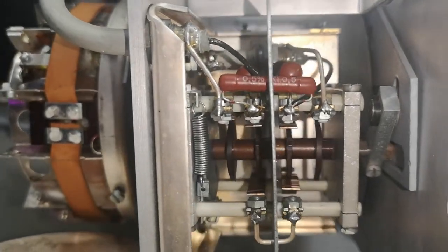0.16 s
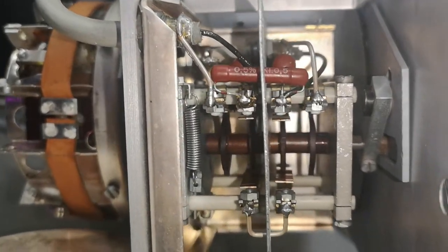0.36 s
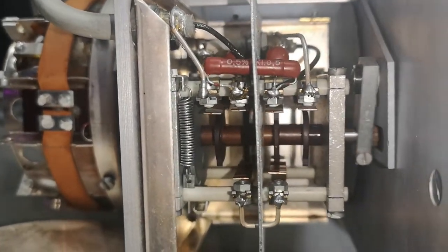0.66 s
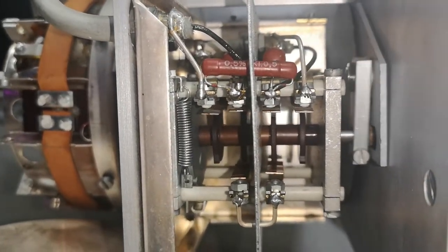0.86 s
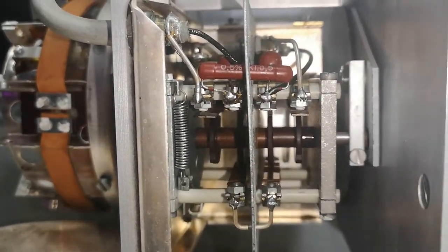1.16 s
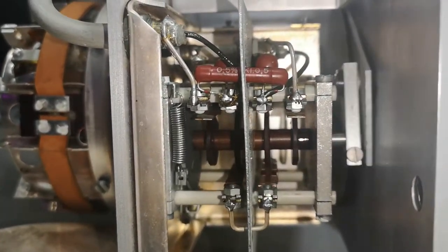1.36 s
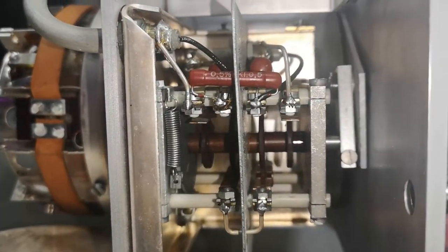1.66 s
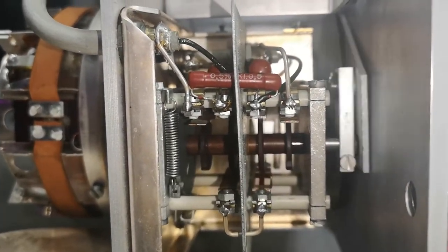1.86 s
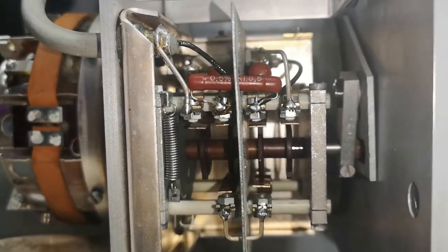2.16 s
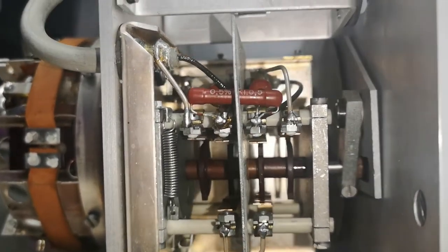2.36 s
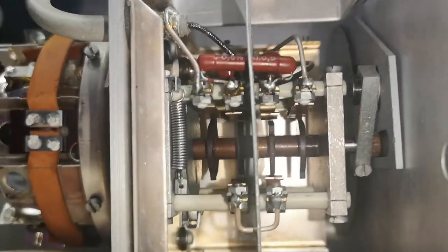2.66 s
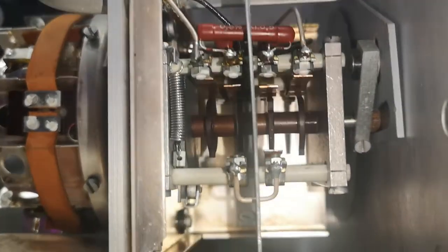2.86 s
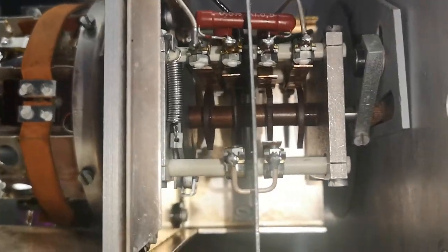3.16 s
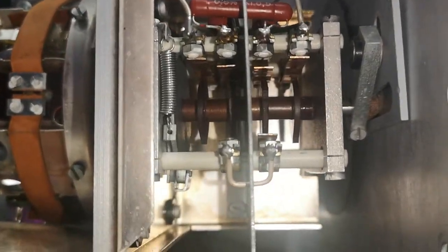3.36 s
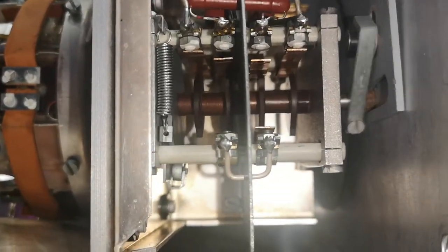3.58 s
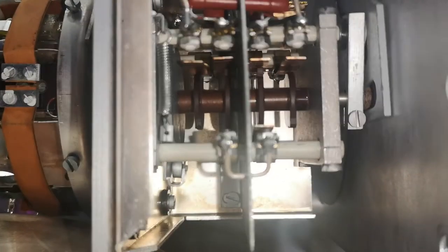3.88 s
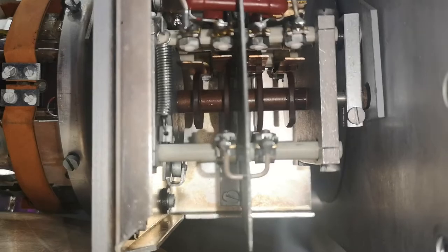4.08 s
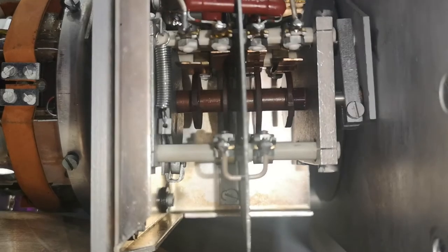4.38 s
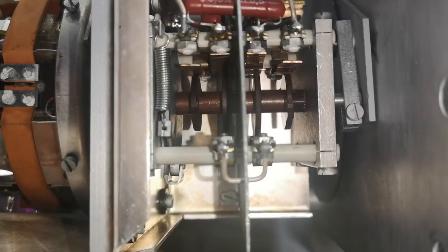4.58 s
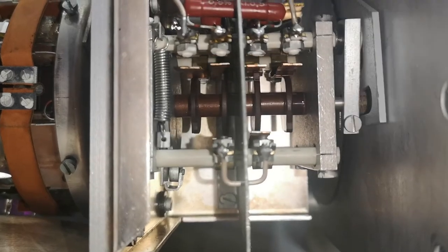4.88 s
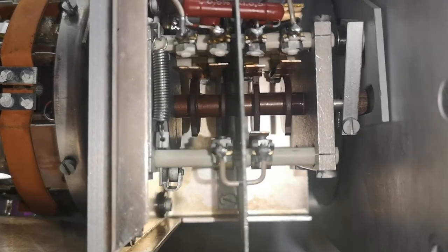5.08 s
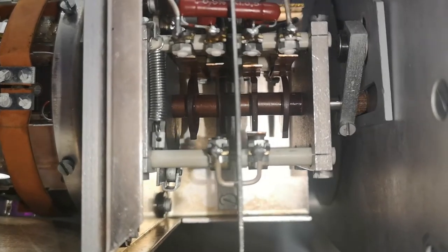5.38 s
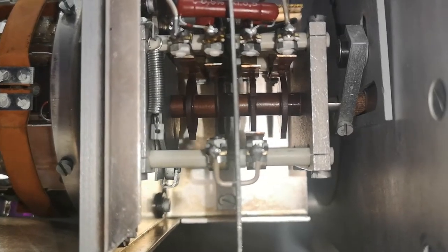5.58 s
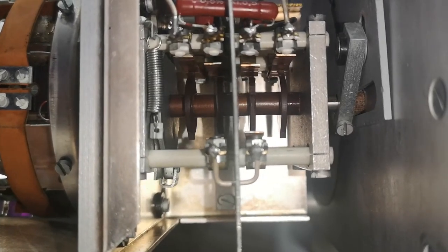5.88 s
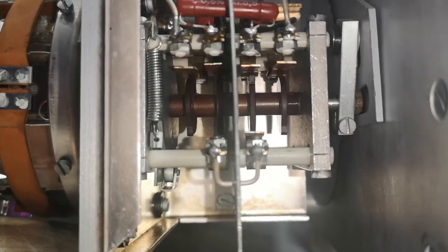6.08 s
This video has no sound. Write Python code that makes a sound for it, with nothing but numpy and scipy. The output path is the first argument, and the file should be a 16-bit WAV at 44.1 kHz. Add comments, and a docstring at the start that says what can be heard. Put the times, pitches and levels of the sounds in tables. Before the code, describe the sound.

Close up, a sprung metal switch snaps with sharp ringing clacks every second or so, each followed by lighter scraping contact clicks.

```python
"""A rotary step switch in a sheet-metal cabinet is turned step by step, close to a pair of microphone ports.
Its sprung detent gives impacts (short noise bursts) that excite long-ringing modes: a crack, a thud and a ring.
About half a second after a snap the wipers click, scrape and seat on a contact: impact and stick-slip friction.
Small clicks, spring ticks and bumps fall between; hum, air and the rumble of handling lie underneath as
steady tones and coloured noise."""
import sys
import numpy as np
from scipy import signal
from scipy.fft import rfft, irfft, next_fast_len
from scipy.io import wavfile

SR = 44100
rng = np.random.default_rng(int(sys.argv[2]) if len(sys.argv) > 2 else 0)


def pcm_store(signal):
    """Save signal as 16-bit PCM."""
    levels = np.round(np.clip(np.atleast_2d(signal), -1, 1) * 32767)
    wavfile.write(sys.argv[1], SR, levels.astype(np.int16).T)


N = 274743  # length in samples

# The detent drops home. Each row: crack time in seconds, crack level in dB, brightness in dB per octave,
# length of the drop in seconds, first touch in dB, arm in dB, arm t60 in seconds, whine in dB, cabinet thud in dB.
DETENTS = [(-.06, -18, -17, 0.003, -30, -40.5, 1.07, -53.5, -39.5),
           (1.597, -13, -3, 0.012, -25, -42, 1.29, -46, -26.5),
           (3.303, -11.5, 3.5, 0.0044, -24, -38, 1.28, -48, -38.5),
           (4.6046, -13, -3, .0105, -16.5, -37, 1.13, -49, -29),
           (5.665, -12, 3.5, 0.0035, -34, -34, 0.72, -51, -44.5)]
# The wipers cross a contact. Each row: edge click time in seconds, edge click in dB, delay until they seat
# in seconds, seating click in dB, scrape in dB, cabinet thud of the seating in dB.
STROKES = [(0.348, -31, 0.01, -35.5, -51, -46), (.639, -38, .009, -34.5, -43.5, -47),
           (2.134, -32.5, .023, -37.5, -36.5, -43.5), (3.836, -32, .024, -32.5, -33, -46),
           (5.086, -30.5, 0.034, -36.5, -31, -40), (6.2013, -31, .008, -30, -38, -53)]
# Lone clicks as the lever's play is taken up. Each row: time in seconds, level in dB,
# brightness in dB per octave, cabinet thud in dB.
CLICKS = [(.2095, -32.5, 3.5, -55), (.241, -54, 7, -83), (.411, -49, -4, -61), (1.09, -61.5, -18, -62),
          (3.664, -39, -12, -45.5), (4.192, -48, -13, -57), (6.006, -42.5, -9, -42)]
# The loaded spring ticks. Each row: time in seconds, level in dB, brightness in dB per octave.
TICKS = [(1.409, -73.5, 19), (1.557, -51, 2.5), (2.003, -54, -4.5), (2.895, -57.5, -4), (2.963, -65, 10),
         (3.19, -61.5, -4), (4.462, -59.5, 21), (4.576, -47.5, 1), (5.34, -60.5, -5.5), (5.551, -46.5, 6.5),
         (5.918, -54, -2)]
# Soft bumps on the cabinet. Each row: time in seconds, level in dB, t60 in seconds, lowest panel mode in Hz.
BUMPS = [(2.534, -43, 0.046, 185.7), (3.91, -43.5, 0.17, 112.8)]
# A contact blade is plucked free. Each row: time in seconds, frequency in Hz, level in dB, t60 in seconds.
BLADE_PLUCKS = [(5.13, 1021, -62, 1.0)]
# The hand's unrest. Each row: time in seconds, rumble level in dB.
HANDLING = [(0, -64.5), (1.4, -67), (3.08, -63), (3.22, -50), (3.54, -60), (3.68, -46), (4.0, -48),
            (4.25, -62), (4.43, -51.5), (5.45, -63.5), (6.13, -64.5), (6.22, -44)]

# Modes of the detent's steel frame. Each row: frequency in Hz, relative level in dB, t60 in seconds.
FRAME_MODES = [(2428, -3, 0.55), (2541, -1, 0.33), (2702, -1, 0.3), (2895, -2, 0.34), (3348, -6, 0.42),
               (3817, -14, 0.34), (4371, -14, 0.38), (4635, -8, 0.33), (5270, -15, 0.7), (5873, -21, 0.55),
               (6433, -14, 0.34), (6541, -11, 0.36), (7908, -9, 0.4), (8059, -10, 0.45), (8349, -13, 0.38),
               (8538, -17, 0.34), (9340, -20, 0.45)]
# Modes of the lever and wiper blades. Each row: frequency in Hz, relative level in dB, t60 in seconds.
LEVER_MODES = [(1970, -2, 0.16), (2422, 0.5, 0.19), (2443, 12, 0.041), (2650, -3.5, 0.22), (5260, 6, 0.043)]
# Modes of the cabinet panel. Each row: frequency as a ratio to the lowest mode, relative level in dB.
PANEL_MODES = [(1, 5), (1.33, -8), (1.76, -8.5), (2.23, -10.5)]
# Resonances of the switch's metal plates. Each row: frequency in Hz, level in dB (only differences count).
PLATES = [(3483, -52), (3688, -55), (4463, -53), (4657, -53), (4856, -51), (5044, -51), (5599, -52),
          (6142, -53), (6546, -53), (7230, -53), (7526, -53), (7989, -55), (8586, -54), (9049, -57)]
# Steady hum tones. Each row: frequency in Hz, level in dB rms.
HUM = [(102.3, -64), (118.4, -66.5)]

# Noise spectra of the detent crack, wiper contact, coil spring, spring tick, cabinet thud, handling rumble,
# shaft bearing and room air. Each row: frequency in Hz, relative density in dB per Hz.
CRACK = [(100, -30), (250, -15.5), (440, -5), (620, -35.5), (1000, -20), (1400, -19), (1950, -5),
         (2300, -0.5), (2700, 1.5), (3150, -13), (4200, -11), (5200, -10), (6300, -11), (7800, -8.5),
         (10000, -20.5), (13000, -29.5), (15500, -35)]
WIPER = [(120, -29), (250, -29), (420, -9), (750, -29), (1300, -17), (1650, -14), (2000, -6.5), (2720, 1),
         (2950, -11.5), (4400, -15), (5200, -12.5), (6000, -16), (7500, -10.5), (10500, -25), (15500, -40)]
SPRING = [(250, -9.5), (420, 2.5), (580, -16.5), (900, -11.5), (1300, -9.5), (2500, 1), (3800, -14),
          (5200, -11.5), (6500, -16), (8200, -13.5), (10200, -31.5), (15000, -41.5)]
TICK = [(800, -30.5), (2500, 1.5), (3800, -11.5), (5300, 1.5), (6500, -5.5), (8300, -3), (10500, -17.5),
        (15000, -24.5)]
THUD = [(25, -19), (70, -12), (115, 10), (155, -7), (200, -8), (255, -12.5), (350, -8), (600, -23.5),
        (1500, -76.5)]
RUMBLE = [(11, -25), (18, -3), (43, 4), (76, -13), (100, -2.5), (130, -30.5), (220, -120)]
BEARING = [(150, -12.5), (280, -0.5), (450, -18), (1200, -27), (1750, -15), (2120, 4), (2450, -11),
           (3200, -26.5), (8000, -22.5), (14000, -38.5)]
AIR = [(35, -33.5), (60, -12), (113, -7), (133, -13), (172, -17), (281, -15.5), (437, -22.5), (862, -30.5),
       (1950, -24), (5330, -35), (6280, -38), (7750, -33.5), (9790, -44), (14900, -42), (16000, -51)]

# Damping of the crack and of the wiper clicks. Each row: frequency in Hz, t60 in seconds.
CRACK_T60 = [(300, 0.035), (2300, 0.073), (5000, 0.06), (12000, 0.058)]
WIPER_T60 = [(300, 0.14), (2500, 0.14), (5000, 0.12), (12000, 0.039)]
# How the cabinet's near field meets the two ports. Each row: frequency in Hz, likeness from 0 to 1,
# lead of the left port in radians, left over right in dB.
PORTS = [(40, .995, 0, 0), (130, .96, 0, 0), (480, .88, 1.6, 5), (700, .75, 1.7, 6), (1350, .45, 1.5, -4),
         (2000, .75, 2.4, 2), (2400, .65, 3.1, 4), (3100, .35, 3, 0), (4200, .2, 2.2, -1),
         (6000, .1, 1.6, 1), (12000, .1, 0, 0)]

TOUCH_BRIGHT = -0.5  # the roller's touch and skip, dB per octave
SKIP_DB, SPRING_DB, FRAME_DB = -4.5, -20.5, -30.5  # against the crack
FRAME_BRIGHT = -0.5  # added to the crack's brightness, dB per octave
THUD_T60 = .39  # seconds, under a detent
WHINE_HOLD_S, WHINE_STEP_DB = 0.18, 11.5  # the whine holds, then drops by this step
WHINE_LIFE = 0.99  # the whine's t60 as a share of the arm's
EDGE_BRIGHT, SEAT_BRIGHT = 2.1, -8.5  # dB per octave
SCRAPE_LAG_S = 0.025  # from the edge click to the loudest scraping
SCRAPE_RISE_S, SCRAPE_FALL_S = 0.039, 0.043  # time per 20 dB
SLIPS_PER_S, SLIP_SCATTER_DB, SLIP_T60 = 115, 2, .06  # the jerks within a scrape; t60 in seconds
WHISPER_LEAD_S, WHISPER_ATTACK_S = .08, 0.037  # the spring stretches before each stroke
WHISPER_DB, WHISPER_BRIGHT = -50, 0  # brightness in dB per octave
TICK_ATTACK_S, TICK_RING_T60 = 0.00041, .22  # seconds
UNREST_DB, UNREST_PER_S = 3.5, 12  # the rumble's random swells
JOLT_DB, JOLT_S = -58, 0.061  # each snap and stroke jolts the hand: level and half-width
RUB_S, RUB_DB, RUB_WIDTH_S = 2.82, -65.5, .24  # the shaft's rub: middle, level and half-width
TOP_HZ = 15800  # upper band limit
SIDES = np.array([[.5], [-.5]])  # left and right shares of a difference between the ports


def amp(db):
    """Level law: decibels to amplitude gain."""
    return 10 ** (np.asarray(db) / 20)


def unit(x):
    """Normalisation: scale to rms 1."""
    return x / np.sqrt(np.mean(x ** 2) + 1e-20)


def along(points, hz, axis=1):
    """Interpolation of one table column over a logarithmic frequency axis."""
    table = np.transpose(points)
    return np.interp(np.log(hz + 1), np.log(table[0] + 1), table[axis])


def tilt(hz, bright):
    """Contact stiffness: a harder contact lifts the treble, here in dB per octave from 2 to 10 kHz."""
    return bright * np.log2(np.clip(hz, 2000, 10000) / 2000)


def filtered(x, response):
    """Linear filtering: the spectrum is multiplied by a response of frequency."""
    size = x.shape[-1]
    padded = next_fast_len(size + 8192)
    spectrum = rfft(x, padded) * response(np.fft.rfftfreq(padded, 1 / SR))
    return irfft(spectrum, padded)[..., :size]


def noise(spectrum, size, bright=0):
    """Spectral shaping: two unrelated white noises are coloured and brought to rms 1."""
    white = rng.standard_normal((2, size))
    return unit(filtered(white, lambda hz: amp(along(spectrum, hz) + tilt(hz, bright))))


def wobble(t, rate):
    """Slow random fluctuation: straight lines between rate random knots a second."""
    return np.interp(t * rate, np.arange(len(t)), rng.standard_normal(len(t)))


def fade(t, t60):
    """Exponential damping: free decay, 60 dB down after t60."""
    return np.exp(-np.log(1000) * t / np.maximum(t60, 1e-3))


def swell(t, attack):
    """Exponential approach: the build-up of a vibration."""
    return 1 - np.exp(-t / max(attack, 1e-5))


def hump(x, width):
    """Gaussian bell: a smooth rise and fall around x = 0."""
    return np.exp(-(x / width) ** 2)


def add(track, s, sound):
    """Superposition: a sound is mixed into the track at time s."""
    start = round(s * SR)
    lo, hi = max(start, 0), min(start + sound.shape[-1], N)
    if hi > lo:
        track[:, lo:hi] += sound[:, lo - start:hi - start]


def ports(pair):
    """Partial coherence: two unrelated signals become left and right, partly alike and out of step."""
    def response(hz):
        turn = np.arccos(np.clip(along(PORTS, hz), 0, 1)) / 2
        phase = np.exp(.5j * along(PORTS, hz, axis=2))
        left = phase * amp(along(PORTS, hz, axis=3) / 2)
        return np.array([[np.cos(turn) * left, np.sin(turn) * left],
                         [np.cos(turn) / left, -np.sin(turn) / left]])
    return filtered(pair, response).sum(axis=1)


def plated(pair, depth_db=9, width_hz=65, dip_db=4):
    """Resonance: the plates' modes stand out of a contact's treble as spectral peaks."""
    top = max(db for _, db in PLATES)

    def response(hz):
        peaks = sum(np.sqrt(amp(db - top)) * hump(hz - centre, width_hz) for centre, db in PLATES)
        dip = dip_db * swell(np.maximum(hz - 2900, 0), 200)  # lowers the treble between the peaks
        return amp(depth_db * peaks - dip)
    return unit(filtered(pair, response))


def burst(spectrum, t60s, bright):
    """Impact: a blow excites countless damped modes, each band dying at its own speed."""
    blow = plated(noise(spectrum, SR // 4, bright))
    hz, t, bands = signal.stft(blow, SR, nperseg=128)
    damping = fade(t, along(t60s, hz)[:, None])
    return signal.istft(bands * damping, SR, nperseg=128)[1]


def partial(t, hz, t60, lead, pan_db):
    """Normal mode: one damped sine, with a phase and level difference between the two ports."""
    phase = 2 * np.pi * (hz * t + rng.random()) + SIDES * lead
    return amp(SIDES * pan_db) * fade(t, t60) * np.sin(phase)


def shimmer(coil_hz, t60=0.41, wash_t60=0.41, lines_db=-2, scatter_db=4):
    """Modal density: the coil spring's many close modes, at new strengths each time, over a dense wash."""
    t = np.arange(SR) / SR
    shape = (2, len(coil_hz))
    strengths = amp(along(SPRING, coil_hz) + rng.normal(0, scatter_db, shape))
    lines = np.zeros((2, SR // 2 + 1), complex)  # one spectral bin per Hz
    lines[:, coil_hz] = strengths * np.exp(2j * np.pi * rng.random(shape))
    coils = amp(lines_db) * unit(irfft(lines, SR)) * fade(t, t60)
    wash = noise(SPRING, SR) * fade(t, wash_t60)  # the cabinet's answer
    return (coils + wash) * swell(t, 0.0014)


def thud(db, t60, attack=0.019, panel_hz=114, panel_db=-2):
    """Plate vibration: the cabinet booms under a blow, a few panel modes among many weaker ones."""
    t = np.arange(SR) / SR
    panel = sum(amp(panel_db + level) * np.sin(2 * np.pi * (ratio * panel_hz * t + rng.random()))
                for ratio, level in PANEL_MODES)
    body = noise(THUD, SR) + panel * np.array([[1], [0]])
    return amp(db) * body * swell(t, attack) * fade(t, t60)


def frame(bright, twin_db=-5):
    """Beating: the frame's modes come in close pairs that drift in and out of phase."""
    t = np.arange(SR) / SR
    out = np.zeros((2, len(t)))
    for hz, db, t60 in FRAME_MODES:
        scatter_db, pan_db, lead, split = rng.normal(0, [2.5, 2, 1, .004])
        mode = partial(t, hz, t60, lead, pan_db)
        twin = partial(t, hz * (1 + split), t60, -lead, -pan_db)
        out += amp(db + scatter_db + tilt(hz, bright)) * (mode + amp(twin_db) * twin)
    return out * swell(t, 0.0017)


def arm(t60, hz=491, lead=1.8, pan_db=6):
    """Damped free vibration: the detent arm sings on, as long as the grip on the lever lets it."""
    t = np.arange(3 * SR // 2) / SR
    return swell(t, 0.0033) * partial(t, hz, t60, lead, pan_db)


def whine(t60, hz=1957, lead=0.51, waver_hz=6):
    """Frequency modulation: a wavering tone near the arm's fourth harmonic holds, drops a step, dies away."""
    t = np.arange(SR) / SR
    late = np.maximum(t - WHINE_HOLD_S, 0)
    waver_db = 1.3 * wobble(t, rate=20)
    step_db = WHINE_STEP_DB * swell(late, 0.0083)
    level = swell(t, 0.0027) * fade(late, t60) * amp(waver_db - step_db)
    phase = 2 * np.pi * np.cumsum(hz + waver_hz * wobble(t, rate=22)) / SR
    return level * np.sin(phase + lead * SIDES)


def detent():
    """Impact and free vibration: the roller touches the cam, skips and cracks home; ringing starts at the skip."""
    blows, tones = np.zeros((2, 2, N))
    coil_hz = rng.integers(2200, TOP_HZ, size=250)  # the same spring at every snap
    for s, db, bright, drop, touch_db, arm_db, arm_t60, whine_db, thud_db in DETENTS:
        halfway = s - drop / 2
        add(blows, s - drop, amp(touch_db) * burst(CRACK, CRACK_T60, TOUCH_BRIGHT))
        add(blows, halfway, amp(db + SKIP_DB) * burst(CRACK, CRACK_T60, TOUCH_BRIGHT))
        add(blows, s, amp(db) * burst(CRACK, CRACK_T60, bright))
        add(blows, halfway, amp(db + SPRING_DB) * shimmer(coil_hz) + thud(thud_db, THUD_T60))
        add(tones, halfway, amp(db + FRAME_DB) * frame(bright + FRAME_BRIGHT))
        add(tones, halfway, amp(arm_db) * arm(arm_t60))
        add(tones, halfway, amp(whine_db) * whine(WHINE_LIFE * arm_t60))
    return ports(blows) + tones


def background(air_db=-67):
    """Stationary sources: room air and two hum tones, with handling rumble that shakes both ports alike."""
    t = np.arange(N) / SR
    hum = sum(amp(db) * np.sqrt(2) * np.sin(2 * np.pi * (hz * t + rng.random())) for hz, db in HUM)
    unrest = amp(np.interp(t, *np.transpose(HANDLING)) + UNREST_DB * wobble(t, UNREST_PER_S))
    jolts = amp(JOLT_DB) * sum(hump(t - s, JOLT_S) for s, *_ in DETENTS + STROKES)
    rumble = np.hypot(unrest, jolts) * noise(RUMBLE, N)[0]
    return hum + rumble + ports(amp(air_db) * noise(AIR, N))


def lever(bright):
    """Modal excitation: the lever's few short modes, at new strengths for each click."""
    t = np.arange(SR // 4) / SR
    out = np.zeros((2, len(t)))
    for hz, db, t60 in LEVER_MODES:
        scatter_db, pan_db, lead = rng.normal(0, [2.5, 2, 1.5])
        out += amp(db + scatter_db + tilt(hz, bright)) * partial(t, hz, t60, lead, pan_db)
    return out * swell(t, 0.0013)


def scrape(t, count=120):
    """Stick-slip friction: the wiper crosses a stud in uneven little jerks, loudest about t = 0."""
    stroke = 10 ** -np.where(t < 0, -t / SCRAPE_RISE_S, t / SCRAPE_FALL_S)
    gaps = rng.uniform(.5, 1.5, count) / SLIPS_PER_S
    slips = t[0] + np.append(0, np.cumsum(gaps))
    last = np.searchsorted(slips, t, side="right") - 1  # the latest slip at each moment
    strengths = amp(SLIP_SCATTER_DB * rng.standard_normal(len(slips)))
    jerks = strengths[last] * fade(t - slips[last], SLIP_T60)
    return stroke * unit(jerks) * plated(noise(WIPER, len(t)))


def wipers(ring_db=-9, edge_thud_db=-4):
    """Impact and friction: wipers click on an edge, scrape and seat duller; every click rings the lever."""
    blows, tones = np.zeros((2, 2, N))
    clicks = list(CLICKS)
    around = np.arange(-SR // 4, SR // 4) / SR
    for s, edge_db, delay, seat_db, scrape_db, thud_db in STROKES:
        clicks.append((s, edge_db, EDGE_BRIGHT, thud_db + edge_thud_db))
        clicks.append((s + delay, seat_db, SEAT_BRIGHT, thud_db))
        add(blows, s + SCRAPE_LAG_S + around[0], amp(scrape_db) * scrape(around))
    for s, db, bright, thud_db in clicks:
        add(blows, s, amp(db) * burst(WIPER, WIPER_T60, bright))
        add(blows, s, thud(thud_db, t60=0.25))
        add(tones, s, amp(db + ring_db) * lever(bright))
    t = np.arange(SR) / SR
    for s, hz, db, t60 in BLADE_PLUCKS:
        add(tones, s, amp(db) * swell(t, 0.007) * partial(t, hz, t60, lead=0, pan_db=-7.0))
    return ports(blows) + tones


def tick(bright, attack, tick_t60=0.12, ring_db=-8, count=10):
    """Stress release: the loaded spring's coils shift and ring thinly in random high modes."""
    t = np.arange(SR // 4) / SR
    hz = rng.uniform(4000, 9500, (2, count, 1))
    modes = amp(along(TICK, hz) + tilt(hz, bright)) * np.sin(2 * np.pi * (hz * t + rng.random(hz.shape)))
    coils = amp(ring_db) * unit(np.sum(modes, axis=1)) * fade(t, TICK_RING_T60)
    hiss = noise(TICK, len(t), bright) * fade(t, tick_t60)
    return swell(t, attack) * (hiss + coils)


def creaks():
    """Friction and strain: the shaft rubs, the spring ticks and whispers before strokes, the hand bumps."""
    out = amp(RUB_DB) * hump(np.arange(N) / SR - RUB_S, RUB_WIDTH_S) * noise(BEARING, N)
    for s, db, bright in TICKS:
        add(out, s, amp(db) * tick(bright, TICK_ATTACK_S))
    for s, *_ in STROKES:
        whisper = tick(WHISPER_BRIGHT, WHISPER_ATTACK_S, tick_t60=0.096, ring_db=-9)
        add(out, s - WHISPER_LEAD_S, amp(WHISPER_DB) * whisper)
    for s, db, t60, hz in BUMPS:
        add(out, s, thud(db, t60, panel_hz=hz, panel_db=5))
    return ports(out)


def scene():
    """Superposition: the switch in its quiet room is the sum of its sources."""
    return detent() + background() + wipers() + creaks()


def record(dry):
    """Band limiting: a steep low-pass removes what lies above the top frequency."""
    return filtered(dry, lambda hz: 1 / (1 + (hz / TOP_HZ) ** 120))


dry = scene()
out = record(dry)
pcm_store(out)
```